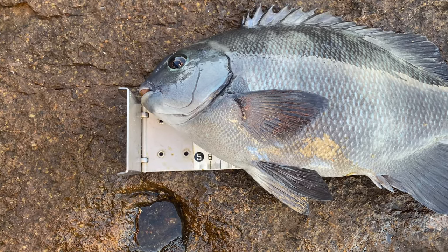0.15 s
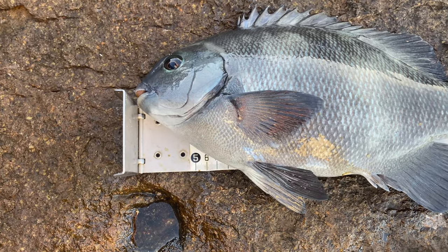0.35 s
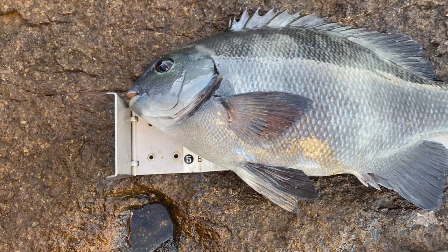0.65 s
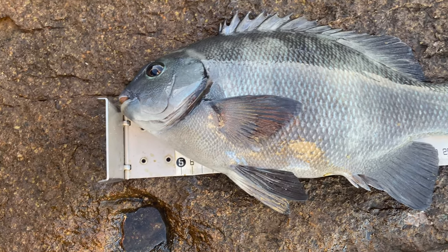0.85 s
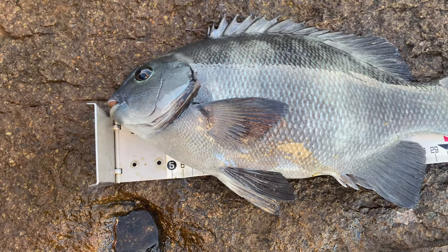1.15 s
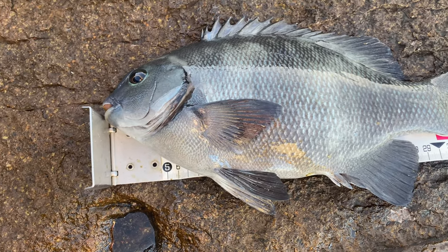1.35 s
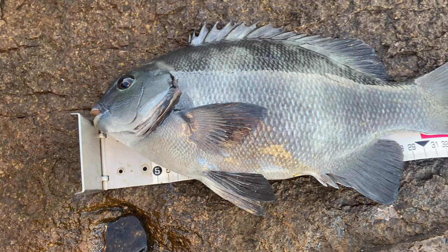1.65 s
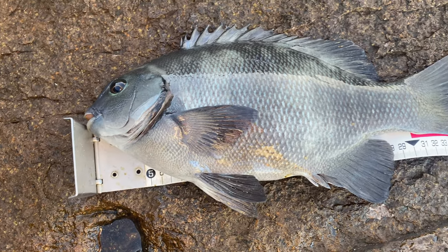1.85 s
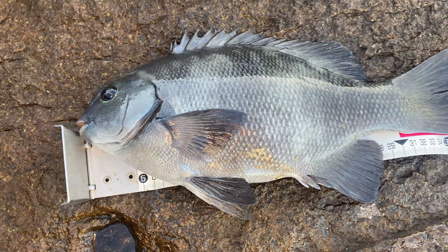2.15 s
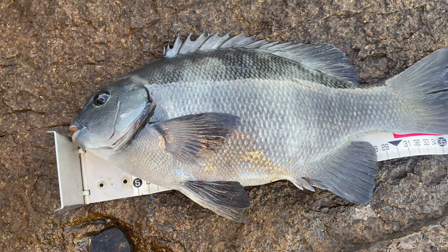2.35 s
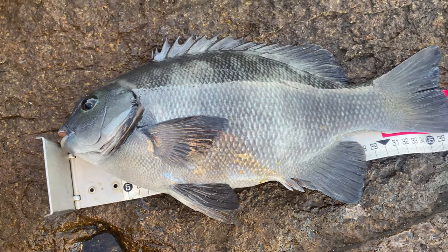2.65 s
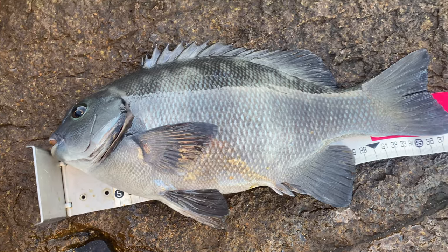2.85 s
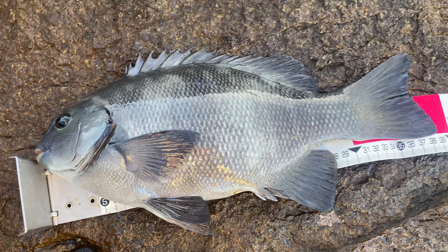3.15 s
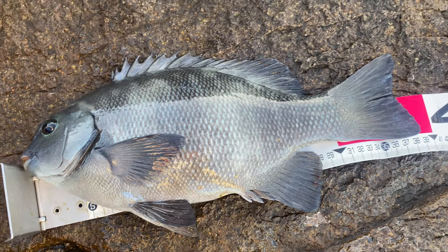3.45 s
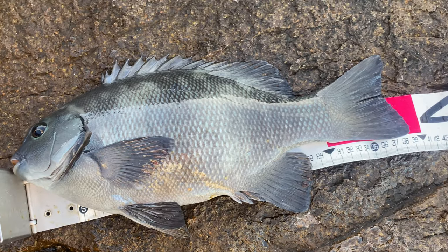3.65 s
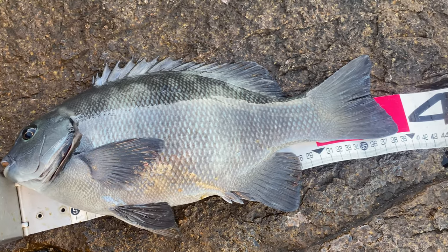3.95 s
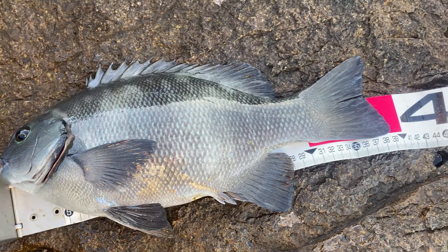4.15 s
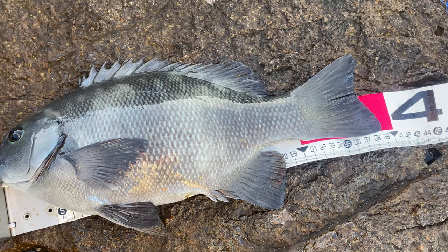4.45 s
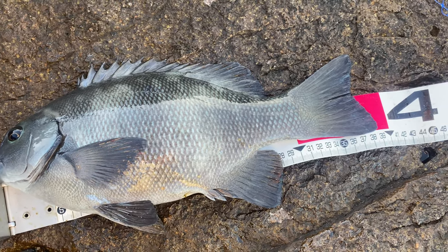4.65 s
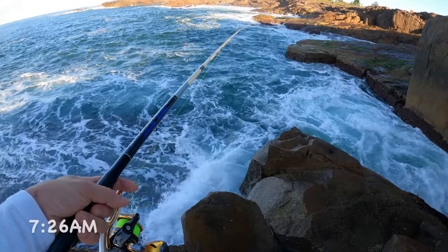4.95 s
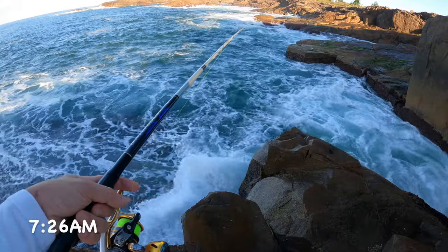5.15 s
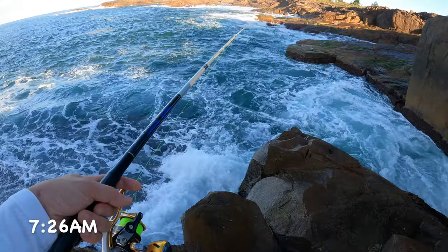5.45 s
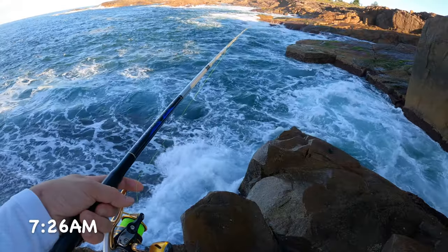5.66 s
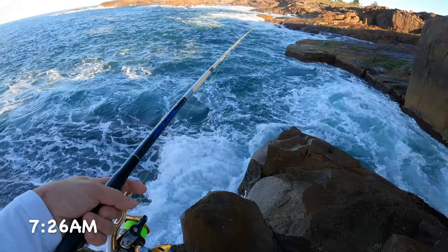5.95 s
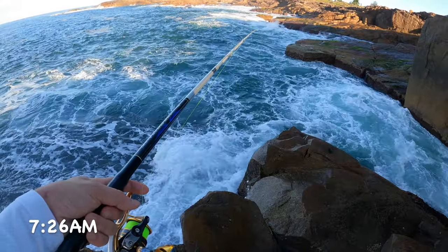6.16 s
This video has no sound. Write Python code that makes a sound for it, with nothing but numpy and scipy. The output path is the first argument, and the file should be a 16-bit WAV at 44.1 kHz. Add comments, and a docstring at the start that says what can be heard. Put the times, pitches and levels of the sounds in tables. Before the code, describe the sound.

Low wind rumble over dull distant surf, then a tiny gap and an abrupt cut to loud white water churning and hissing close by.

```python
"""Surf from two places

Surf on a rocky shore, heard from two places in turn with a brief near-silent gap between.
First a sheltered ledge: wind rumbles on a two-port microphone over the dull roar of distant breakers.
Then the edge: white water churns and hisses right below a nearly mono microphone.
Surf and wind are noise in narrow, drifting bands; gurgles are pitched noise, a far whistle a gliding sine."""
import sys
import numpy as np
from scipy import signal
from scipy.fft import rfft, irfft, next_fast_len
from scipy.io import wavfile

SR = 44100
rng = np.random.default_rng(int(sys.argv[2]) if len(sys.argv) > 2 else 0)


def inscribe(sig):
    """Save sig as 16-bit PCM at rate SR to the path in sys.argv[1].

    A 1-D sig is mono; a 2-D sig holds one channel per row.
    Samples are clipped to [-1, 1] before scaling.
    """
    pcm = np.round(np.clip(np.atleast_2d(sig).T, -1, 1) * 32767)
    wavfile.write(sys.argv[1], SR, pcm.astype(np.int16))


N = 277830  # samples, 6.3 s

# Upper limits of all layers but the top one. Each entry: frequency in Hz.
LAYER_TOPS_HZ = [90, 180, 360, 720, 1150, 1820, 2900, 4600, 7300]

# Faint thin whistle in the distance, perhaps a sea bird. Each row: time in s, pitch in Hz, level in dB.
WHISTLE = [(.97, 4400, -85), (1.0, 4450, -67), (1.03, 4470, -68), (1.055, 4490, -76), (1.075, 4450, -65),
           (1.11, 4350, -60), (1.14, 4250, -67), (1.16, 4240, -74), (1.19, 4280, -63), (1.22, 4260, -65),
           (1.245, 4200, -85)]
WHISTLE_ROUGH_DB, WHISTLE_WOBBLE_HZ = 2.5, 25

# Buffets of wind that swell the rumble. Each row: centre in s, rise in dB.
BUFFETS = [(2.53, 3), (3.05, 4), (3.5, 5.5), (3.93, 11), (5.14, 3.5), (5.55, 1.5), (5.93, 3.5), (6.18, 3)]
BUFFET_SIGMA_S = 0.037

# Brief pitched gurgles in the wash. Each row: centre in s, bell sigma in s, pitch in Hz, level in dB.
GURGLES = [(.4, .05, 2150, -61), (.55, .04, 2150, -61), (.96, .04, 2100, -59), (1.13, .035, 2420, -59),
           (5.57, .04, 1100, -34)]
GURGLE_BANDWIDTH_RATIO = 0.08  # share of the pitch

# Colour of the sea through each microphone, relative within a layer.
# Each row: frequency in Hz, left density in dB per Hz, right density in dB per Hz.
LEDGE_COLOUR = [(20, -32.1, -31.0), (35, -21, -16), (61, 0.5, -0.5), (119.4, -0.5, -3.5), (198.5, -7, -10),
                (254, -14.5, -8.5), (330, -14.5, -10.5), (505, -10, -12.5), (585, -15.5, -13),
                (746, -16, -13.5), (1134, -25, -22), (1290, -23.5, -24.5), (1450, -29, -29),
                (1730, -30.5, -29), (2150, -30, -29), (2480, -32, -30), (2900, -34, -34.5),
                (3450, -34, -35.5), (4300, -35.5, -44), (5150, -33.5, -40), (6070, -36, -48.5),
                (8550, -42.5, -42), (12200, -46.5, -47), (12800, -52, -53), (15000, -55, -54)]
EDGE_COLOUR = [(20, -23, -22), (46, -6, -5), (84.5, -2, -2), (240, -1.1, -0.84), (388, -1.5, -2.5),
               (850, -7.5, -7.5), (1040, -6, -5), (1480, -6, -6.5), (1930, -15, -13.5), (2670, -20, -17.5),
               (4800, -19.5, -19.5), (5840, -24.5, -24), (7500, -25.5, -26), (8250, -32, -31.5),
               (9700, -37, -37.5), (12500, -40, -40.5), (14000, -54, -52), (14500, -62, -62),
               (14900, -90, -90)]

# Likeness of the two ports. Each row: frequency in Hz, share heard alike (0 to 1).
LEDGE_ALIKE = [(60, 1), (120, 0.99), (210, 0.9), (320, 0.98), (800, 0.74), (1200, 0.38), (1600, 0.67),
               (2200, 0.33), (3600, 0.48), (4500, 0.45), (7000, 0.38), (8500, 0.99), (9500, 0.4),
               (10500, 0.9)]
EDGE_ALIKE = [(300, 1), (500, 1), (820, 0.83), (1200, 1), (1900, 0.93), (2600, 0.62), (3200, 0.83),
              (4300, 0.97), (5500, 1), (7000, 0.91), (10000, 1), (12500, .5), (14000, .8)]

# Phase lag between the ports. Each row: frequency in Hz, lag of left behind right in radians.
LEDGE_LAG = [(60, 0.14), (130, 0.29), (210, 1.64), (350, 1.04), (620, 2.65), (1800, 3.28), (2300, 5.44),
             (4000, 6.7), (4900, 8.9), (5400, 3.9), (7500, 10.7), (8700, 9.7), (10500, 12.8), (11600, 13.2),
             (12700, 15.708)]
EDGE_LAG = [(300, .01), (800, 0.39), (1050, .2), (1650, 0.97), (2600, 0.65), (3100, 0.49), (3500, 0.75),
            (3900, .05), (5000, .01)]

# Span of each place. One row: start in s, fade-in in s, end in s, fade-out in s.
LEDGE_HEARD = (-.1, .01, 4.759, .005)
EDGE_HEARD = (4.791, .012, 6.4, .01)

# Deep sound. Each row: time in s, deep rumble in dB, rumble in dB, low roar in dB, upper roar in dB.
LEDGE_DEEP = [(0.0, -35, -32.5, -42, -45.5), (0.42, -36.5, -32.5, -42, -42), (0.63, -33, -36, -42.5, -43),
              (0.94, -36.5, -33, -40.5, -40.5), (1.3, -37, -32.5, -41, -43.5), (1.8, -41, -37, -42, -45),
              (2.04, -37, -34, -41.5, -43), (2.45, -38.5, -35, -41, -42.5), (2.88, -33.5, -33, -38.5, -43),
              (3.12, -30, -35, -39, -42), (3.24, -35.5, -29.5, -39, -43.5),
              (3.47, -37, -32.5, -37.5, -42.5), (3.92, -35.5, -36.5, -39.5, -42.5),
              (4.19, -35.5, -34, -37.5, -42.5), (4.48, -33.5, -32, -37, -39.5),
              (4.75, -32, -31, -37.5, -40.5)]
EDGE_DEEP = [(4.81, -37, -29, -25.5, -29), (5.1, -37, -29.5, -27.5, -28), (5.4, -34.5, -31, -27.0, -28.5),
             (5.64, -37, -29.5, -25.5, -27.5), (5.92, -32.5, -34, -28.5, -28.5),
             (6.2, -31.5, -30, -28.5, -27.5), (6.3, -29.5, -29, -27.5, -29)]

# Wash: waves break and drain at the ledge, churn at the edge.
# Each row: time in s, low band in dB, middle band in dB, upper band in dB.
LEDGE_WASH = [(0, -48.5, -53.5, -53), (0.15, -50.5, -53.5, -57.5), (0.35, -49.5, -53.5, -54.5),
              (0.55, -50.5, -53.5, -56), (0.72, -48.5, -53.5, -58), (0.85, -52.5, -52.5, -55.5),
              (0.97, -50.5, -53.5, -53.5), (1.13, -51.5, -54, -56.5), (1.3, -52.5, -54, -55.5),
              (1.55, -52, -53, -55), (1.8, -49.5, -51.5, -55), (2.05, -53, -53.5, -56),
              (2.3, -50.0, -53, -57.5), (2.55, -49.5, -52, -57), (2.8, -50.5, -52, -57.5),
              (3.05, -49.5, -52.0, -54.5), (3.3, -49.5, -52.0, -55.5), (3.55, -50, -52.0, -53.0),
              (3.75, -53, -53.5, -54.5), (3.92, -50, -52.0, -55.0), (4.1, -51, -54.5, -57),
              (4.3, -49, -52.5, -54.5), (4.5, -47, -51, -52.5), (4.75, -48.5, -50, -52.0)]
EDGE_WASH = [(4.81, -29.0, -31, -36.5), (4.95, -30.5, -31, -37), (5.1, -33, -30.5, -36.5),
             (5.25, -31.0, -31.5, -38.5), (5.4, -32.5, -32, -36), (5.52, -29, -30.0, -36),
             (5.64, -29.5, -31.5, -36.0), (5.78, -32, -32.5, -38.5), (5.92, -32.5, -31.5, -37.5),
             (6.08, -32, -32.5, -39), (6.2, -32, -34.5, -38.0), (6.3, -31, -34, -41)]

# Foam. Each row: time in s, hiss in dB, bright hiss in dB, finest spray in dB.
LEDGE_FOAM = [(0, -55.5, -58.5, -61.0), (0.25, -56.5, -59, -61.5), (0.5, -57, -58.5, -63.5),
              (0.7, -56, -59.0, -63.5), (0.84, -59.5, -61, -66), (1, -54.5, -59, -63),
              (1.25, -55.5, -58.0, -63), (1.55, -54.5, -57.5, -62.5), (1.9, -56.5, -59, -61.5),
              (2.15, -56.5, -60.5, -62), (2.45, -57, -62, -63.5), (2.75, -58.5, -61.5, -65),
              (3.05, -55.0, -59.5, -62.5), (3.35, -54.5, -58.0, -63.5), (3.6, -54, -58.5, -62),
              (3.8, -53.5, -58, -62.0), (3.95, -56.0, -60.5, -65), (4.1, -59, -63, -66.5),
              (4.3, -54.5, -58.0, -61.5), (4.5, -54, -57.5, -59.5), (4.75, -52.5, -56.0, -59.5)]
EDGE_FOAM = [(4.81, -35.5, -36.5, -44), (4.95, -34.5, -35.0, -42.5), (5.1, -35.5, -36.5, -45),
             (5.25, -38, -38, -45.5), (5.4, -36.5, -38, -45), (5.52, -36, -36.5, -44),
             (5.64, -35, -35.5, -43.5), (5.78, -36.5, -38, -44.5), (5.92, -37, -37.5, -45),
             (6.08, -37, -39, -45.5), (6.2, -37, -39.5, -47), (6.3, -38, -39.0, -45.5)]

RUMBLE_LAYERS, FOAM_LAYERS = 2, 3  # lowest and highest of the ten
FOAM_PATCHINESS_RATIO = 0.45  # share of the patchiness left in the foam
TRAIL_DB, TRAIL_T60_S = -24, 0.07  # faint trail without rumble after the fade-out
STOPBAND_EDGE_HZ = 15900


def from_db(db):
    """Convert decibels to gain."""
    return 10 ** (np.asarray(db) / 20)


def rms_one(x):
    """Scale to unit power."""
    return x / np.sqrt(np.mean(x ** 2) + 1e-20)


def at_hz(points, hz):
    """Interpolate table columns on a log-frequency axis."""
    knots_hz, *values = np.transpose(points)
    return np.array([np.interp(np.log(hz + 1), np.log(knots_hz), v) for v in values])


def columns(t, rows):
    """Interpolate table columns in time."""
    knots_s, *values = np.transpose(rows)
    return [np.interp(t, knots_s, v) for v in values]


def drift(corner_hz, size):
    """Slow chance of spread 1: coarse noise through a double one-pole low-pass."""
    step = 40  # samples per coarse point
    settle = 2000  # coarse points dropped while the filter settles
    pole = np.exp(-2 * np.pi * corner_hz * step / SR)
    noise = rng.standard_normal(size // step + settle + 2)
    slow = signal.lfilter([1], [1, -2 * pole, pole * pole], noise)[settle:]
    return np.interp(np.arange(size) / step, np.arange(len(slow)), rms_one(slow - slow.mean()))


def bell(t, centre_s, sigma_s):
    """Gaussian swell with a peak of 1."""
    return np.exp(-0.5 * ((t - centre_s) / sigma_s) ** 2)


def whistle():
    """One gliding sine that swells, wavers and breaks."""
    t = np.arange(N) / SR
    knots_s, hz, db = np.transpose(WHISTLE)
    pitch_hz = np.interp(t, knots_s, hz) + WHISTLE_WOBBLE_HZ * drift(40, N)
    tone = np.sin(2 * np.pi * np.cumsum(pitch_hz) / SR)
    level_db = np.interp(t, knots_s, db, left=-200, right=-200) + WHISTLE_ROUGH_DB * drift(40, N)
    return np.sqrt(2) * from_db(level_db) * tone  # sqrt(2): levels are RMS


def buffets_db(t):
    """Wind swells the rumble in bell shapes, summed in dB."""
    return sum(rise_db * bell(t, centre_s, BUFFET_SIGMA_S) for centre_s, rise_db in BUFFETS)


def gurgles():
    """Narrow bands of noise under bell-shaped swells."""
    t = np.arange(N) / SR
    out = np.zeros(N)
    for centre_s, sigma_s, hz, db in GURGLES:
        half_ratio = GURGLE_BANDWIDTH_RATIO / 2
        edges_hz = [hz * (1 - half_ratio), hz * (1 + half_ratio)]
        band = signal.butter(2, edges_hz, "band", fs=SR, output="sos")
        noise = rms_one(signal.sosfilt(band, rng.standard_normal(N)))
        out += from_db(db) * bell(t, centre_s, sigma_s) * noise
    return out


def layer_levels_db(t, deep_rows, wash_rows, foam_rows):
    """Levels of two rumble, two roar, three wash and three foam layers; wind lifts the rumble."""
    deep, rumble, *roar = columns(t, deep_rows)
    wind = buffets_db(t)
    return [deep + wind, rumble + wind, *roar, *columns(t, wash_rows), *columns(t, foam_rows)]


def bubble_spectra(size, grain_db, colour, alike, lag):
    """Countless bursting bubbles at two ports: a shared part, delayed between them, and a private part."""
    hz = np.fft.rfftfreq(size, 1 / SR)
    clumps = from_db(grain_db * drift(140, size))
    shared, private = rfft(rng.standard_normal((2, size)) * clumps)
    likeness = np.clip(at_hz(alike, hz)[0], 0, 1)
    even = np.sqrt(1 + likeness) * shared
    odd = np.sqrt(1 - likeness) * private
    half_turn = np.exp(0.5j * at_hz(lag, hz)[0])
    ports = [(even + odd) / half_turn, (even - odd) * half_turn]
    return hz, from_db(at_hz(colour, hz)) * ports


def swelling_layers(hz, spectra, size, surge_db, patchy_db, buffet_db):
    """Third-octave-spaced bands swell partly together, partly alone, and add up to layers."""
    octave = np.log2(hz + 1)
    count = len(LAYER_TOPS_HZ) + 1
    layers = np.zeros((count, 2, size))
    surge = drift(6.3, size)
    for centre in np.arange(4, 14.5, 1 / 3):
        # overlapping neighbours add up to one
        shape = np.cos(np.pi * np.clip(3 * (octave - centre) / 2, -0.5, 0.5)) ** 2
        k = np.searchsorted(LAYER_TOPS_HZ, 2 ** centre)
        own_db = buffet_db if k < RUMBLE_LAYERS else patchy_db  # wind sets the rumble's own swell
        if k >= count - FOAM_LAYERS:
            own_db = own_db * FOAM_PATCHINESS_RATIO
        swell_db = surge_db * surge + own_db * drift(12.6, size)
        layers[k] += from_db(swell_db) * irfft(spectra * shape, size)
    return layers


def surf(tables, heard, colour, alike, lag, grain_db, surge_db, patchy_db, buffet_db):
    """Bubble noise in layers, each set to its level curve by mid-channel power, then faded."""
    start_s, rise_s, end_s, fall_s = heard
    first = max(int(start_s * SR), 0)
    size = next_fast_len(min(int((end_s + TRAIL_T60_S) * SR), N) - first + 1)
    t = (first + np.arange(size)) / SR
    hz, spectra = bubble_spectra(size, grain_db, colour, alike, lag)
    layers = swelling_layers(hz, spectra, size, surge_db, patchy_db, buffet_db)

    fade_in = np.clip((t - start_s) / rise_s, 0, 1)
    fade_out = np.clip((end_s - t) / fall_s, 0, 1)
    trail = from_db(TRAIL_DB - 60 * np.maximum(t - end_s, 0) / TRAIL_T60_S)
    sound = np.zeros((2, size))
    for k, (layer, level_db) in enumerate(zip(layers, layer_levels_db(t, *tables))):
        mid_rms = np.sqrt(np.mean(layer.mean(axis=0) ** 2))
        ending = np.maximum(fade_out, trail * (k >= RUMBLE_LAYERS))
        sound += ending * from_db(level_db) * layer / mid_rms
    out = np.zeros((2, N + size))
    out[:, first:first + size] = fade_in * sound
    return out[:, :N]


def scene():
    """Whistle and gurgles with the surf at the ledge, then at the edge."""
    background = whistle() + gurgles()
    ledge = surf((LEDGE_DEEP, LEDGE_WASH, LEDGE_FOAM), LEDGE_HEARD, LEDGE_COLOUR, LEDGE_ALIKE, LEDGE_LAG,
                 grain_db=0.25, surge_db=-0.1, patchy_db=1.38, buffet_db=0.5)
    edge = surf((EDGE_DEEP, EDGE_WASH, EDGE_FOAM), EDGE_HEARD, EDGE_COLOUR, EDGE_ALIKE, EDGE_LAG,
                grain_db=0.6, surge_db=-0.32, patchy_db=0.9, buffet_db=1.4)
    return background + ledge + edge


def record(dry):
    """Cut the top with a steep low-pass, 70 dB down from the stopband edge."""
    low_pass = signal.cheby2(20, 70, STOPBAND_EDGE_HZ, fs=SR, output="sos")
    return signal.sosfilt(low_pass, dry)


dry = scene()
out = record(dry)
inscribe(out)
```